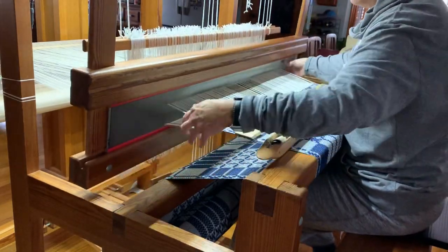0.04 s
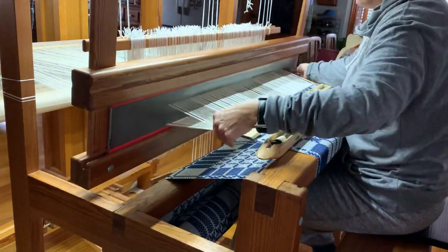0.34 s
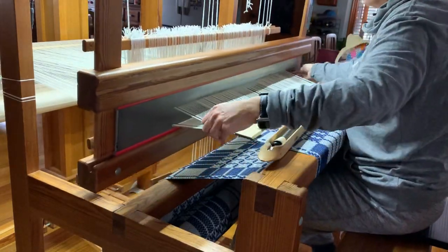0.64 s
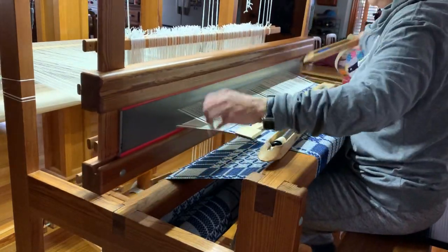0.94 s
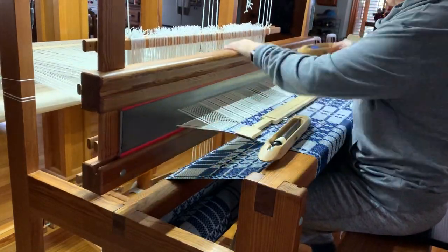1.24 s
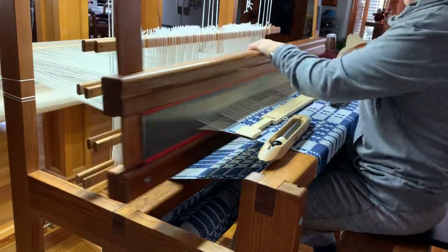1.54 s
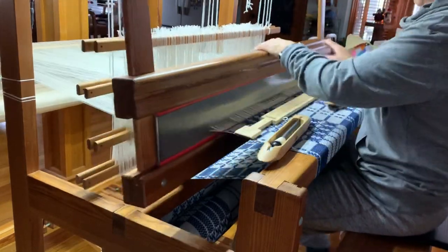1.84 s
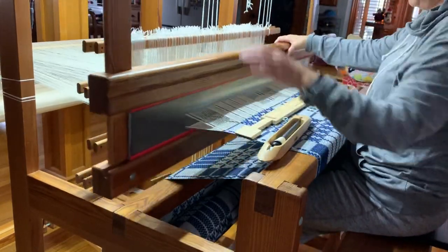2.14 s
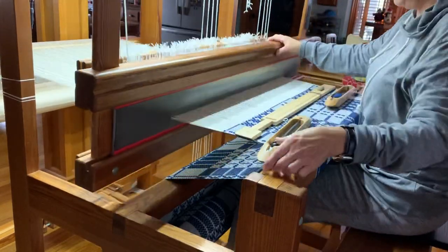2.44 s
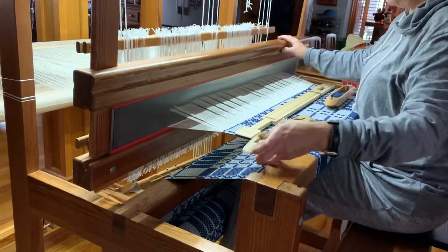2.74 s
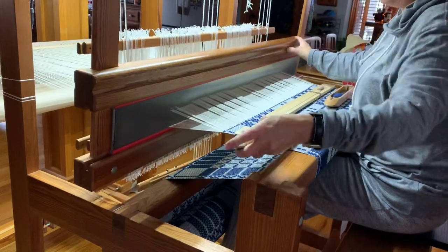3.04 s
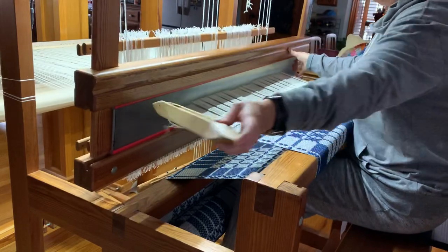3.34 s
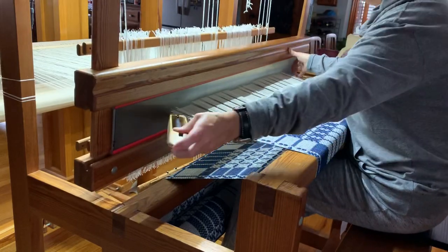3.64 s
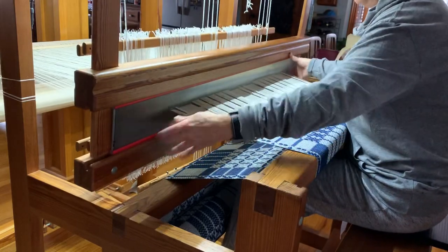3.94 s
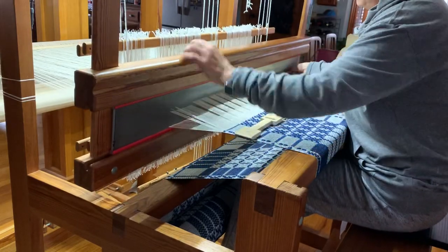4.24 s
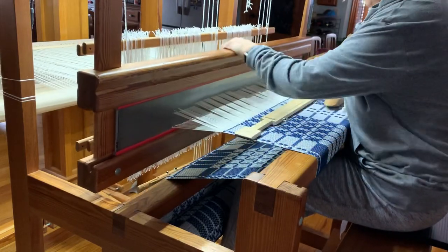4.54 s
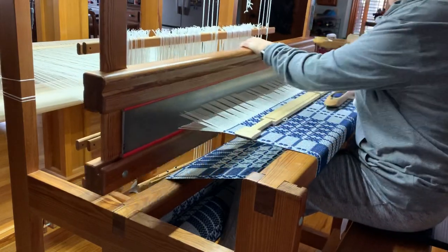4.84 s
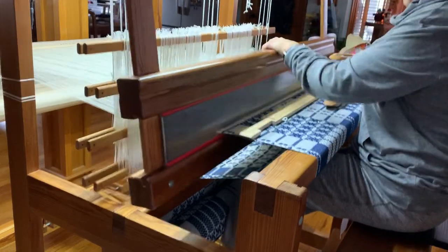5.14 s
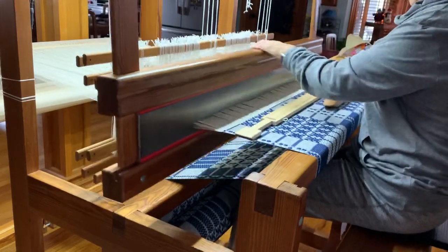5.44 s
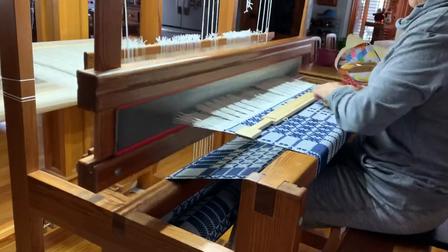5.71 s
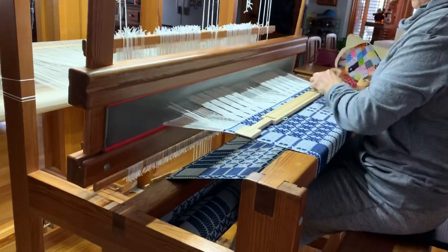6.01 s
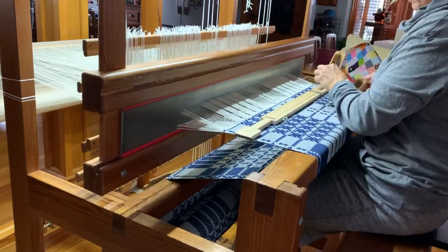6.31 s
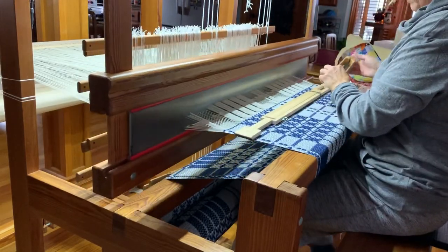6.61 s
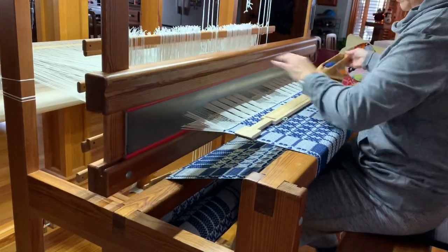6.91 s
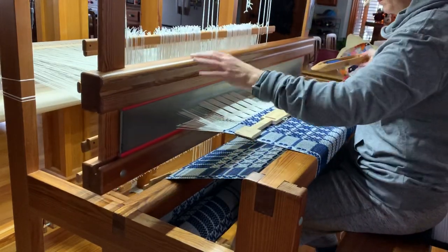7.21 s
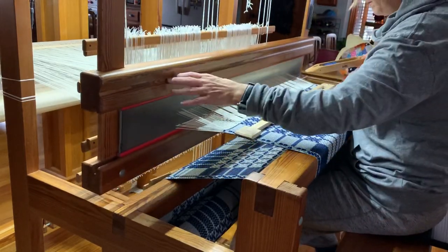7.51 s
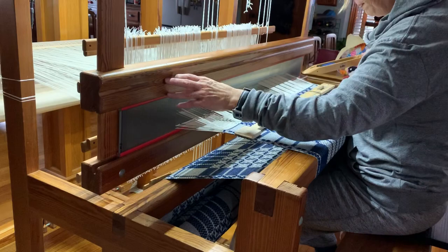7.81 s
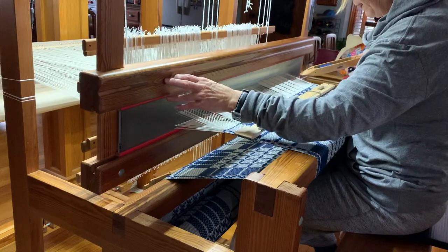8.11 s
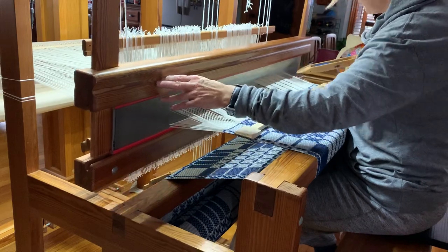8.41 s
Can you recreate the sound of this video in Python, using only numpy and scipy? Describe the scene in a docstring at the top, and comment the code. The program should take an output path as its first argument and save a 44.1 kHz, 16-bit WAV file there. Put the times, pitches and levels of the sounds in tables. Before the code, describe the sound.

A wooden floor loom is worked close by in a slightly echoing living room. A hollow shuttle scrapes and rattles lightly, then the beater thumps the frame with a click and a brief steel buzz, and the shafts drop with a clatter. The shuttle passes again, and a second thump and clatter follow. Softer knocks and treadle bumps finish, over a low, steady motor hum.

```python
"""Weaving on a wooden floor loom

Twice the beater swings through the warp, clicks in its pivots, thumps the frame and jogs the steel reed;
then the shafts drop and clatter. In between, a hollow shuttle scrapes through the shed and is set down,
and feet feel for the treadles. The living room echoes, and a household motor hums low and steady."""
import sys
import numpy as np
from scipy import signal
from scipy.fft import rfft, irfft
from scipy.io import wavfile
from scipy.ndimage import uniform_filter1d

SR = 44100
rng = np.random.default_rng(int(sys.argv[2]) if len(sys.argv) > 2 else 0)


def put_to_file(sound):
    """Save the sound as 16-bit audio at rate SR, in the file named by the first command-line argument."""
    columns = np.atleast_2d(sound).T  # one column per channel
    safe = np.clip(columns, -1, 1)
    whole_steps = np.round(safe * 32767)
    wavfile.write(sys.argv[1], SR, whole_steps.astype(np.int16))


N = 377496
TAPS = 8192
HZ = np.fft.rfftfreq(TAPS, 1 / SR)

# Beater strokes. Each row: start in seconds, relative level in dB, extra bass in dB, extra treble in dB.
BEATS = [(1.663, -10.5, 4, 1.5), (5.086, -8.5, 0.5, 5)]
# Touch, full blow, settling. Each row: delay in seconds, dB re the beat, bass and treble shares in dB.
BEAT_CONTACTS = [(-.002, -5.5, -14.5, -20), (.028, 0, -11, -20), (0.048, -26.5, -5, 13.5)]
# Stray knocks in the loom's timber. Each row: start in seconds, relative level, bass and treble shares in dB.
STRAY_KNOCKS = [(0.253, -38.5, 2, -13), (1.401, -33.5, -12, -10), (1.939, -28, -19, -17),
                (2.115, -32, -14.5, -14), (2.599, -26, -10, -12.5), (2.708, -27.5, -12, -22),
                (4.876, -31.5, -12, -4.5), (4.955, -30, -16, -16.5), (5.993, -35, -8.5, -22.5),
                (6.159, -23, -17, -8), (6.527, -37, -10.5, -18)]
# Wood-on-wood spectrum. Each row: frequency in Hz, gain in dB.
KNOCK_COLOUR = [(30, -28.5), (110, -1.5), (250, -8.5), (650, -8), (1200, -4.5), (1900, -6), (2600, -9.5),
                (4000, -14.5), (6500, -27.5), (8500, -32.5), (12000, -39), (15500, -38.5)]
# Timber resonances. Each row: frequency in Hz, lift in dB.
TIMBER_MODES = [(431, 4), (611, 3), (728, 5.5), (1258, 3), (1786, -3)]


def beater_knocks():
    """The beater meets the cloth in three contacts; stray knocks sound through the same timber."""
    contacts = [(s + delay_s, db + part_db, bass_db + extra_bass_db, treble_db + extra_treble_db)
                for s, db, extra_bass_db, extra_treble_db in BEATS
                for delay_s, part_db, bass_db, treble_db in BEAT_CONTACTS]
    body_db = read(KNOCK_COLOUR, HZ) + lifts(TIMBER_MODES, width_hz=60)
    return blows(contacts + STRAY_KNOCKS, body_db,
                 trim_db=-2.5, rattle_s=0.0097, rise_s=0.0029, lumpy_db=3.5, spot_db=1)


# Pivot contacts. Each row: delay in seconds, relative level in dB.
PIVOT_CLICKS = [(.0018, -6), (.0295, -7)]
# Click spectrum. Each row: frequency in Hz, gain in dB.
CLICK_COLOUR = [(100, -28.5), (600, -9.5), (1600, -6.5), (3500, 5.5), (6500, -7), (8500, -14.5),
                (15000, -31.5)]


def pivots(trim_db=2):
    """Play in the beater's joints snaps shut on the first two contacts of each beat."""
    out = np.zeros((2, N))
    click = causal(read(CLICK_COLOUR, HZ))
    for s, db, _, _ in BEATS:
        for delay_s, part_db in PIVOT_CLICKS:
            add(out, s + delay_s, gain_of(db + part_db + trim_db) * click / abs(click).max())
    return out


# Light, then full weight on the frame. Each row: delay in seconds, dB re the beat plus its extra bass.
BEAT_THUMPS = [(.006, -24), (0.048, -16.5)]
# Treadles change the shed. Each row: start in seconds, relative thump level in dB, lead-in level in dB.
SHEDS = [(2.406, -14.5, -25), (5.531, -12, -35)]
# Frame modes. Each row: frequency in Hz, gain in dB, t60 in seconds.
FRAME_MODES = [(41, -16.5, 1), (61.6, -6, 0.94), (75.05, -5.5, 0.87), (111.3, -11, 0.25),
               (174.2, -5.5, 0.53), (308, -18, 0.99)]


def frame(shed_lag_s=0.064, shed_trim_db=-21):
    """The whole loom shudders on the floor as the weight of beater or shafts reaches it."""
    out = np.zeros((2, N))
    thumps = [(s + delay_s, db + bass_db + part_db)
              for s, db, bass_db, _ in BEATS for delay_s, part_db in BEAT_THUMPS]
    thumps += [(s + shed_lag_s, db + shed_trim_db) for s, db, _ in SHEDS]
    for s, db in thumps:
        add(out, s, gain_of(db) * ring(FRAME_MODES, rise_s=0.0057))
    return out


def lead_in(swell_s=0.011, beat_db=-40.5, knock_trim_db=-21):
    """A faint, brief swell of noise leads into each beat, shed change, knock and snap."""
    out = np.zeros((2, N))
    t = np.arange(TAPS) / SR
    swell = np.exp(-t[::-1] / swell_s)
    hits = [(s, beat_db) for s, *_ in BEATS] + [(s, lead_in_db) for s, _, lead_in_db in SHEDS]
    hits += [(s, db + knock_trim_db) for s, db, *_ in STRAY_KNOCKS + SNAPS]
    for s, db in hits:
        add(out, s - t[-1], gain_of(db) * swell * noise_pair(TAPS, KNOCK_COLOUR))
    return out


# Jogs of the reed. Each row: start in seconds, relative level in dB, lift of the top modes in dB.
JINGLES = [(0.114, -35, -0.5), (0.499, -53.5, 24), (4.16, -40.5, 8), (5.478, -37, -1)]
# Clustered steel resonances. Each row: frequency in Hz, width in Hz, gain in dB.
REED_MODES = [(5400, 240, -5), (5675, 140, -0.5), (7580, 400, -6), (8260, 520, -6), (6970, 3600, -16),
              (10820, 1400, -11.5), (12600, 500, -13), (14850, 320, -13)]


def reed(lag_s=0.052, beat_trim_db=-10.5, beat_lift_db=-10, trim_db=15):
    """The steel reed buzzes in its slot once the beater has stopped, and when jogged."""
    out = np.zeros((2, N))
    shaken = [(s + lag_s, db + beat_trim_db, beat_lift_db + treble_db) for s, db, _, treble_db in BEATS]
    for s, db, lift_db in shaken + JINGLES:
        steel = causal(peaks(REED_MODES) + read([(9000, 0), (11000, lift_db)], HZ))
        contacts = chatter(rattle_s=0.016, rise_s=0.002, lumpy_db=4)
        add(out, s, gain_of(db + trim_db) * filtered(contacts, steel))
    return out


# Shafts land in turn, mostly lower as more weight arrives.
# Each row: start in seconds, level in dB, pitch in Hz.
LANDINGS = [(2.406, -18, 1034), (2.42, -19.5, 1300), (2.433, -17, 900), (2.447, -25.5, 1240),
            (5.502, -21, 1613), (5.528, -14, 1342), (5.548, -16.5, 850), (5.557, -18, 1330),
            (5.578, -19, 734)]
# Shaft resonances. Each row: frequency in Hz, lift in dB.
SHAFT_MODES = [(725, 3.5), (1010, 1), (1270, 5), (1880, 11), (2700, 8), (3320, 11)]


def shafts(rise_s=0.0012, octave_drop_db=6.5, skirt_db=-38):
    """Each shaft lands with a compact clack around one pitch."""
    out = np.zeros((2, N))
    for s, db, hz in LANDINGS:
        clack_db = np.maximum(-octave_drop_db * np.log2((HZ + 1) / hz) ** 2, skirt_db)
        body = causal(clack_db + lifts(SHAFT_MODES, width_hz=48))
        contacts = chatter(rattle_s=0.011, rise_s=rise_s, lumpy_db=0.5)
        add(out, s - rise_s, gain_of(db) * filtered(contacts, body / np.linalg.norm(body)))
    return out


# Bar rattles. Each row: start in seconds, relative level, bass and treble shares in dB.
CLATTERS = [(2.251, -36, -24, -7), (2.522, -28, -22, 4.5), (2.78, -38.5, -24, -13),
            (3.15, -43.5, -7.5, -18.5), (5.593, -25.5, -7, 8.5)]
# Rattle spectrum. Each row: frequency in Hz, gain in dB.
CLATTER_COLOUR = [(30, -31.5), (120, 4), (400, 2.5), (1000, 4), (2000, 7.5), (3200, 3), (5000, -6),
                  (7000, -15.5), (8500, -21), (12000, -32), (15500, -22.5)]


def bar_clatter():
    """The shafts' light bars rattle through the timber."""
    body_db = read(CLATTER_COLOUR, HZ) + lifts(TIMBER_MODES, width_hz=60)
    return blows(CLATTERS, body_db, trim_db=1, rattle_s=0.019, rise_s=0.003, lumpy_db=1.5, spot_db=1.2)


# Hard taps. Each row: start in seconds, relative level, bass and treble shares in dB.
SNAPS = [(0.09, -39, -0.5, -1), (2.049, -28, -20, -8), (5.475, -24, -12, -5), (7.423, -44, -8, -16),
         (8.294, -48.5, -10, 2.5)]
# Tap spectrum. Each row: frequency in Hz, gain in dB.
SNAP_COLOUR = [(500, -2.5), (1400, 4), (3000, -3), (8000, -8.5), (15500, -17.5)]


def snaps():
    """Brief hard taps that hardly rattle."""
    body_db = read(SNAP_COLOUR, HZ)
    return blows(SNAPS, body_db, trim_db=2.5, rattle_s=0.0077, rise_s=0.0022, lumpy_db=3, spot_db=5)


# Taps on a loose bar. Each row: start in seconds, relative level in dB.
BAR_PINGS = [(2.494, -31.5), (2.783, -42.5), (3.152, -48.5), (4.794, -56.5)]
# Free bar modes. Each row: frequency in Hz, gain in dB, t60 in seconds.
BAR_MODES = [(1150, -10, 0.2), (1626, 5.5, 0.21), (2190, -9, 0.13), (2820, -8, 0.13)]
# Knocked hollow parts. Each row: start in seconds, level in dB, pitch in Hz.
HOLLOW_NOTES = [(0.095, -33, 464), (0.119, -32.5, 418), (0.206, -29, 1200), (0.254, -30, 1000),
                (0.254, -33.5, 708), (0.255, -32, 440), (2.251, -41.5, 3820), (2.458, -23.5, 2810),
                (2.496, -22.5, 3086), (4.316, -26, 603), (5.796, -30, 1142), (6.162, -25, 1543),
                (6.159, -26, 2797), (6.161, -33.5, 3477), (6.53, -38.5, 684)]


def loose_wood(hollow_t60_s=0.049, pair_ratio=0.88):
    """A loose bar rings freely; hollow parts answer a knock with a short beating pair of modes."""
    out = np.zeros((2, N))
    for s, db in BAR_PINGS:
        add(out, s, gain_of(db) * ring(BAR_MODES, rise_s=0.00037))
    for s, db, hz in HOLLOW_NOTES:
        pair = [(hz, 0, hollow_t60_s), (hz * pair_ratio, -5, hollow_t60_s)]
        add(out, s, gain_of(db) * ring(pair, rise_s=0.0026))
    return out


# Pushes over the warp. Each row: peak time in seconds, level in dB, swell and fade in seconds.
GLIDES = [(.03, -53, 0.13, 0.03), (.73, -56, 0.085, 0.047), (3.85, -59.5, 0.083, 0.075),
          (3.95, -42.5, 0.056, 0.034)]
# Pick-up, rattle along the race, catch.
# Each row: start in seconds, relative level, bass and treble shares in dB.
SHUTTLE_HITS = [(0.113, -33, -14.5, -6), (0.491, -41.5, -9, -10.5), (3.667, -55.5, 9, -4),
                (4.119, -37.5, -3, -10), (4.157, -36.5, -1.5, 0), (4.314, -32.5, -6.5, -2)]
# Small shuttle's resonances. Each row: frequency in Hz, width in Hz, gain in dB.
SMALL_SHUTTLE_MODES = [(457, 420, 3), (1000, 540, -0.5), (2116, 250, -1), (3180, 8300, -8)]
# Large shuttle's resonances. Each row: frequency in Hz, width in Hz, gain in dB.
LARGE_SHUTTLE_MODES = [(440, 420, -1.5), (900, 900, -1.5), (1830, 130, -2), (2420, 240, 0.5),
                       (3000, 96, -9), (3356, 190, -4.5), (3750, 180, -2), (4740, 1200, -11.5),
                       (6380, 490, -10), (2440, 8600, -11.5)]


def shuttles(swap_s=2, scrape_focus=1.65):
    """A small, then a large hollow shuttle; scraping picks out resonances more sharply than knocking."""
    out = np.zeros((2, N))
    for modes, from_s, to_s in [(SMALL_SHUTTLE_MODES, 0, swap_s), (LARGE_SHUTTLE_MODES, swap_s, N / SR)]:
        body_db = peaks(modes)
        glides = [row for row in GLIDES if from_s <= row[0] < to_s]
        hits = [row for row in SHUTTLE_HITS if from_s <= row[0] < to_s]
        out += friction(glides, scrape_focus * body_db, grain_db=4.5)
        out += blows(hits, body_db, trim_db=2.5, rattle_s=0.019, rise_s=0.0028, lumpy_db=3, spot_db=3)
    return out


# Feet on treadles. Each row: start in seconds, relative level, bass and treble shares in dB.
BUMPS = [(2.189, -28, 0.5, -18), (3.035, -39.5, 3, -17), (6.208, -33.5, 5.5, 4), (6.8, -31, -24, -13),
         (6.869, -42, 4, -12), (7.128, -47, 0.5, -28.5), (7.221, -39.5, 3.5, -18.5), (7.382, -32.5, 0, -13),
         (7.426, -36, -3, -11), (7.525, -34.5, 1, -7.5)]
# Shuffling feet. Each row: peak time in seconds, level in dB, swell and fade in seconds.
SHUFFLE = [(6.9, -49, 0.052, 0.17)]
# Bump spectrum. Each row: frequency in Hz, gain in dB.
BUMP_COLOUR = [(30, -13.5), (90, -14.5), (170, 4), (350, 7), (700, -4.5), (1500, -7.5), (3800, -21),
               (5000, -29.5), (8000, -56)]
# Treadle resonances. Each row: frequency in Hz, lift in dB.
TREADLE_MODES = [(170, 2.4), (1030, 6), (1730, 6.36), (2140, 4.6), (3080, 9.1), (3700, 11), (4800, 7.2)]
# Dulling by soft soles. Each row: frequency in Hz, gain in dB.
SOLE_COLOUR = [(500, 2), (3000, -17.5)]


def treadles():
    """Feet bump the treadles and shuffle over them in soft soles."""
    body_db = read(BUMP_COLOUR, HZ) + lifts(TREADLE_MODES, width_hz=84)
    bumps = blows(BUMPS, body_db, trim_db=-5, rattle_s=0.011, rise_s=0.003, lumpy_db=0, spot_db=1)
    return bumps + friction(SHUFFLE, body_db + read(SOLE_COLOUR, HZ), grain_db=6.5)


# Shuttle, yarn and hands brush the warp.
# Each row: peak time in seconds, relative level in dB, swell and fade in seconds.
RUBS = [(.21, -48.5, 0.042, 0.045), (1.25, -76, 0.017, 0.59), (2.24, -57, 0.096, 0.064),
        (3.945, -42.5, 0.042, 0.054), (4.19, -45, 0.04, 0.031), (5.82, -55.5, 0.086, 0.019),
        (6.55, -64.5, 0.054, 0.013)]
# Brushing spectrum. Each row: frequency in Hz, gain in dB.
RUB_COLOUR = [(60, -37), (250, -10.5), (700, -11.5), (1500, -19), (4000, -15.5), (8000, -21), (11000, -23),
              (14000, -19.5), (15500, -27.5)]
# Spectrum of threads in reed and heddles. Each row: frequency in Hz, gain in dB.
THREAD_COLOUR = [(300, -9.5), (1500, -5), (5000, -0.5), (14000, -8.5)]


def warp(sweep_trim_db=-33, heddle_lag_s=0.038):
    """The warp hisses when brushed, through the reed at each beat and the heddles at each shed change."""
    reed_sweeps = [(s, db + sweep_trim_db, 0.018, 0.056) for s, db, _, _ in BEATS]  # columns as RUBS
    heddle_drags = [(s + heddle_lag_s, -37, 0.014, 0.026) for s, *_ in SHEDS]
    brushing = friction(RUBS, read(RUB_COLOUR, HZ), grain_db=3.5)
    return brushing + friction(reed_sweeps + heddle_drags, read(THREAD_COLOUR, HZ), grain_db=3)


# Living room decay. Each row: frequency in Hz, t60 in seconds.
ROOM_T60 = [(60, 0.97), (150, 0.94), (400, 0.72), (1000, 0.53), (2800, 0.55), (7000, 0.42), (13000, 0.092)]


def room(x, rise_s=0.00044):
    """Reflections thicken quickly, then die band by band; each input channel has its own tail."""
    build_up = 1 - np.exp(-np.arange(SR) / SR / rise_s)
    out = np.zeros((2, N))
    for channel in x:
        hz, times, spectra = signal.stft(noise_pair(SR), SR, nperseg=512)
        decay = np.exp(-np.log(1000) * times / read(ROOM_T60, hz)[:, None])
        tail = signal.istft(spectra * decay, SR, nperseg=512)[1][:, :SR] * build_up
        out += filtered(tail / np.linalg.norm(tail), channel)[:, :N]
    return out


# Motor partials. Each row: frequency in Hz, rms level in dB.
HUM_PARTIALS = [(56.3, -50.5), (120, -63.5), (214, -70)]
# Room air spectrum. Each row: frequency in Hz, gain in dB.
AIR_COLOUR = [(25, -24.5), (45, -3.5), (75, 0), (130, -5.5), (200, -8), (300, -14.5), (500, -22.5),
              (1000, -30), (2000, -36), (4000, -46), (8000, -44.5), (13000, -40), (15500, -53)]


def motor_and_air(air_db=-59, waver=0.25):
    """A household motor hums over faint room air, wavering in level and phase."""
    t = np.arange(N) / SR
    knots_s = np.arange(0, 10, 0.25)
    hum = np.zeros(N)
    for hz, db in HUM_PARTIALS:
        drift = waver * np.interp(t, knots_s, rng.standard_normal(len(knots_s)))
        phase = 2 * np.pi * (hz * t + rng.random()) + drift
        hum += np.sqrt(2) * gain_of(db) * (1 + drift) * np.sin(phase)
    pan = gain_of([[0.5], [-0.5]])
    return pan * hum + gain_of(air_db) * noise_pair(N, AIR_COLOUR)


# Likeness of the two microphones. Each row: frequency in Hz, correlation from 0 to 1.
LIKENESS = [(60, 1), (150, 0.69), (300, 0.86), (600, 0.33), (1200, 0.4), (2500, 0.011), (5000, 0.019),
            (7500, 0.42), (13000, 0.027)]


def noise_pair(size, colour=None):
    """Noise at two microphones, alike in the bass and mostly unrelated higher up."""
    left, other = rfft(rng.standard_normal((2, size)))
    hz = np.fft.rfftfreq(size, 1 / SR)
    likeness = read(LIKENESS, hz)
    right = likeness * left + np.sqrt(1 - likeness ** 2) * other
    gain = gain_of(read(colour, hz) if colour else 0)
    return unit_rms(irfft(np.array([left, right]) * gain, size))


def blows(rows, body_db, trim_db, rattle_s, rise_s, lumpy_db, spot_db):
    """Each blow chatters into a body; a random landing spot decides which modes stand out."""
    out = np.zeros((2, N))
    for s, db, bass_db, treble_db in rows:
        spot = unit_rms(np.convolve(rng.standard_normal(len(HZ)), np.hanning(41), "same"))
        body = causal(balanced(body_db + spot_db * spot, bass_db, treble_db))
        contacts = chatter(rattle_s, rise_s, lumpy_db)
        add(out, s - rise_s, gain_of(db + trim_db) * filtered(contacts, body))
    return out


def chatter(rattle_s, rise_s, lumpy_db, crossfeed=0.2):
    """Parts meet unevenly: a burst of small contacts that builds and dies away."""
    t = np.arange(TAPS) / SR
    lumps = flicker(TAPS, lumpy_db, smooth_samples=60)
    envelope = np.exp(-t / rattle_s) * (1 - np.exp(-t / rise_s)) ** 2
    contacts = noise_pair(TAPS)
    contacts = contacts + crossfeed * contacts[::-1]  # direct sound is more alike at both microphones
    return unit_rms(contacts * lumps * envelope) * np.sqrt(np.mean(envelope ** 2))


def friction(strokes, colour_db, grain_db):
    """Surfaces catch and slip: grainy hiss that swells and fades with each stroke."""
    t = np.arange(N) / SR
    envelope = sum(gain_of(db) * np.exp(-abs(t - s) / np.where(t < s, swell_s, fade_s))
                   for s, db, swell_s, fade_s in strokes)
    grains = flicker(N, grain_db, smooth_samples=260)
    hiss = filtered(noise_pair(N) * grains, causal(colour_db))[:, :N]
    return envelope * unit_rms(hiss)


def ring(modes, rise_s):
    """Dying sines, fed over a short contact time."""
    t = np.arange(SR) / SR
    tones = sum(gain_of(db - 60 * t / t60_s) * np.sin(2 * np.pi * (hz * t + rng.random()))
                for hz, db, t60_s in modes)
    return tones * (1 - np.exp(-t / rise_s))


def flicker(size, rms_db, smooth_samples):
    """A randomly fluctuating gain."""
    return gain_of(rms_db * unit_rms(uniform_filter1d(rng.standard_normal(size), smooth_samples)))


def peaks(resonances):
    """Spectrum in dB of steep-sided resonances."""
    power = sum(gain_of(db) ** 2 / (1 + (2 * (HZ - hz) / width_hz) ** 2) ** 2
                for hz, width_hz, db in resonances)
    return 10 * np.log10(power)


def lifts(resonances, width_hz):
    """The dB by which narrow resonances stand out of a spectrum."""
    return sum(db / (1 + (2 * (HZ - hz) / width_hz) ** 2) for hz, db in resonances)


def balanced(db, bass_db, treble_db):
    """Shelves a spectrum toward given bass and treble shares beside a middle of power 1."""
    bands_hz = [(120, 450), (500, 2500), (3000, 8000)]
    power = gain_of(db) ** 2
    low, middle, high = (10 * np.log10(np.mean(power * (HZ > lo) * (HZ < hi))) for lo, hi in bands_hz)
    shelves = [(300, bass_db - low), (650, -middle), (1900, -middle), (3800, treble_db - high)]
    return db + read(shelves, HZ)


def causal(db):
    """Minimum-phase response of a spectrum."""
    log_gain = np.log(gain_of(np.maximum(db, -100)))
    mirrored = np.concatenate([log_gain, log_gain[-2:0:-1]])
    return np.fft.ifft(np.exp(np.conj(signal.hilbert(mirrored)))).real


def filtered(pair, response, mode="full"):
    """Convolves both channels with one response."""
    return signal.oaconvolve(pair, response[None], mode, axes=1)


def read(points, hz):
    """Reads a table along a logarithmic frequency axis."""
    points_hz, values = np.transpose(points)
    return np.interp(np.log(hz + 1), np.log(points_hz + 1), values)


def add(mix, s, sound):
    """Mixes a sound in at s seconds."""
    part = mix[:, max(round(s * SR), 0):][:, :sound.shape[-1]]
    part += sound[..., :part.shape[-1]]


def gain_of(db):
    """Decibels to amplitude."""
    return 10 ** (np.asarray(db) / 20)


def unit_rms(x):
    """Scales to rms 1."""
    return x / np.sqrt(np.mean(x ** 2) + 1e-20)


def scene():
    """The loom's parts and their shares of the room, over the hum."""
    beater = beater_knocks()
    light_wood = bar_clatter() + snaps()
    feet, threads = treadles(), warp()
    beater += lead_in() + pivots()
    clacks, shuttle, steel = shafts(), shuttles(), reed()
    light_wood += loose_wood()
    heavy_send = gain_of(-0.5) * beater + gain_of(-4) * feet
    light_send = gain_of(-2.5) * light_wood + gain_of(-6) * steel + gain_of(-3) * clacks
    light_send += gain_of(-3.5) * (shuttle + threads)
    echoes = room(heavy_send) + room(light_send)
    direct = beater + clacks + steel + light_wood + feet + shuttle + gain_of(-3) * threads + frame()
    return direct + echoes + motor_and_air()


# Microphone response. Each row: frequency in Hz, gain in dB.
MIC_RESPONSE = [(8400, -1), (9100, -10.5), (9800, -37.5), (10500, -13), (11200, -2), (14800, -2),
                (15900, -10)]


def record(dry, port_hz=8100, port_width_hz=1700, port_turn_rad=2.1, cutoff_hz=15900):
    """The microphone ports notch the treble and turn its phase near resonance; a low-pass follows."""
    hz = np.fft.rfftfreq(N, 1 / SR)
    left_lead_rad = port_turn_rad * np.exp(-((hz - port_hz) / port_width_hz) ** 2)
    turn = np.exp(0.5j * left_lead_rad * np.array([[1], [-1]]))
    heard = irfft(rfft(dry) * turn * gain_of(read(MIC_RESPONSE, hz)), N)
    return filtered(heard, signal.firwin(255, cutoff_hz, window=("kaiser", 7), fs=SR), "same")


dry = scene()
out = record(dry)
put_to_file(out)
```